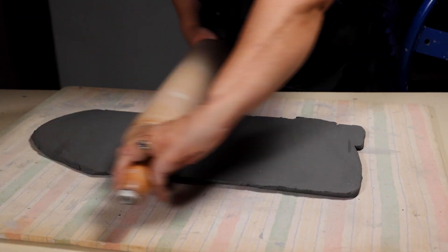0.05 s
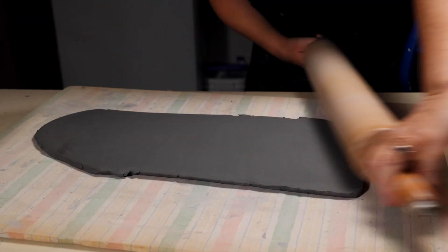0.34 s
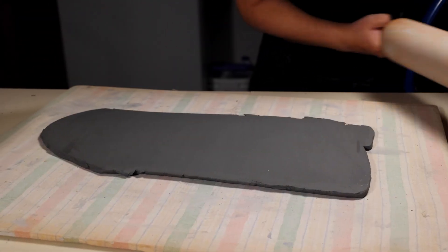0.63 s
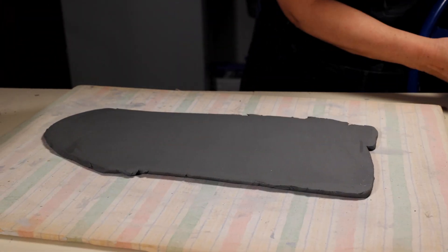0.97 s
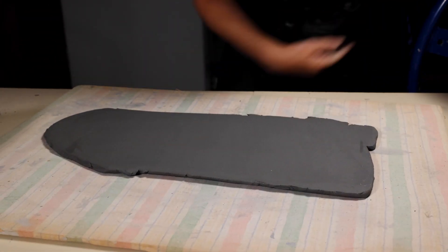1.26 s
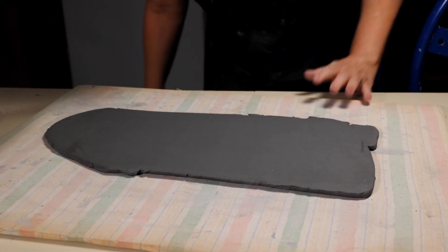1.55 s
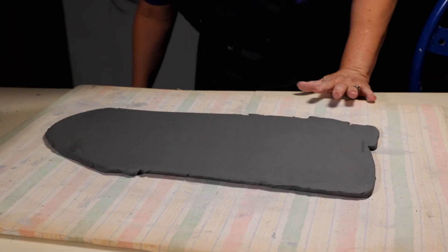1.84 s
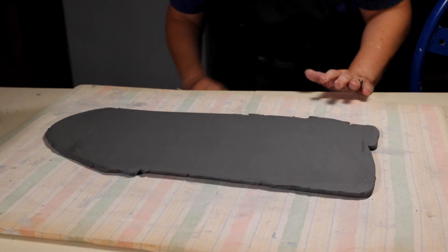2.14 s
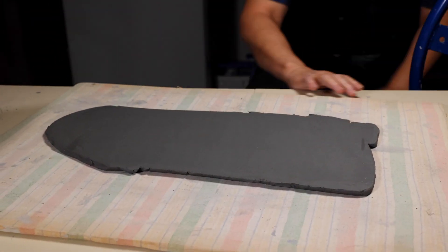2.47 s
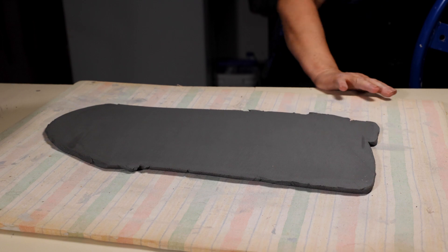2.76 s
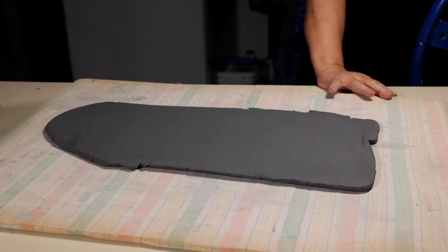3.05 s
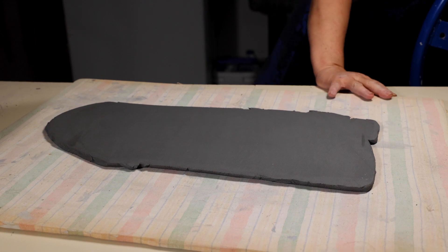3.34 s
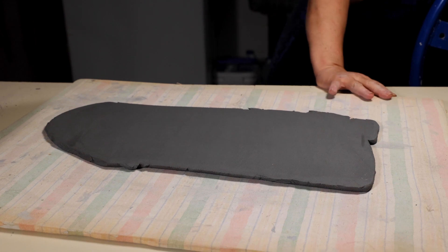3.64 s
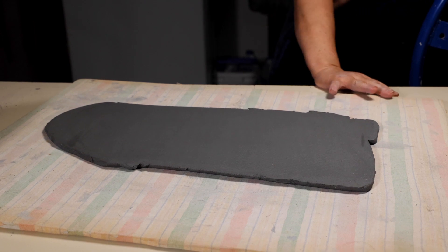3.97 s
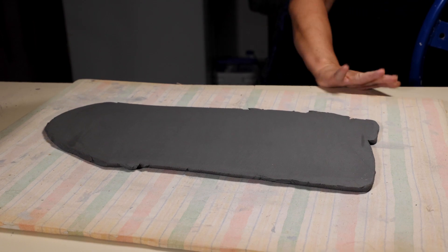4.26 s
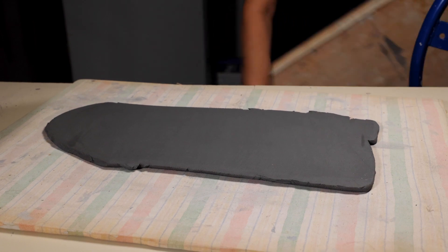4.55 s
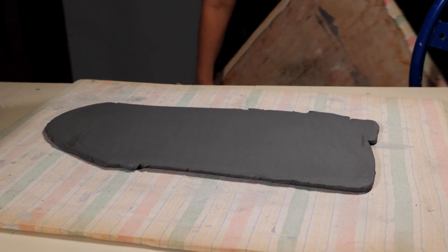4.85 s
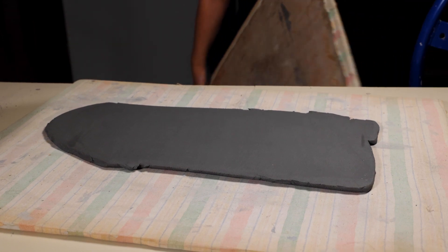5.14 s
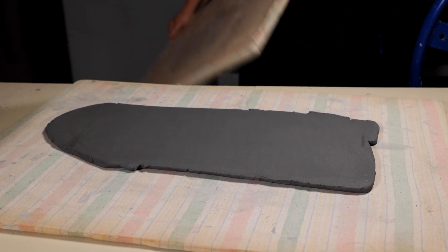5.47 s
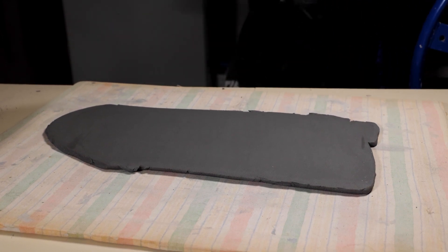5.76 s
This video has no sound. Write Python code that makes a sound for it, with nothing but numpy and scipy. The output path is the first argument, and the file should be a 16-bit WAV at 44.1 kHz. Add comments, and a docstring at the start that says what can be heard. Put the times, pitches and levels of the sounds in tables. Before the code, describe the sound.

A wooden rolling pin trundles faintly off canvas, its loose handles clicking lightly during the first half second. At about 0.9 and 1.1 seconds it lands on a table with two hard, ringing wooden knocks with a low thud. They are by far the loudest sounds and slightly overload the close microphone. A small rattle follows, then a soft pat of a hand at about 1.7 seconds. From 2 to 4.4 seconds sleeves rustle and a hand brushes the canvas quietly, while a wooden board gives short, faint scrapes, with a slight judder around 3 seconds and a soft bump at 3.7. From 4.6 to 5.5 seconds the board is dragged out, rubbing on clothing, with hollow bumps and sharp ticks, strongest near 4.9. A last rustle fades by 5.8 seconds. The room is small and quiet, with a faint low rumble throughout.

```python
"""In a small quiet room, a wooden rolling pin with loose, clicking handles is lifted off a clay slab and set
down on a table. Two hard knocks excite the modes of pin and table and overload a close microphone.
Then sleeves rustle and a hand brushes the canvas, as threads catch and let go. A wooden board is dragged
out from beside the table, ringing where it bumps and scraping by stick-slip friction, over a low rumble."""
import sys
import numpy as np
from scipy import signal
from scipy.fft import rfft, irfft
from scipy.io import wavfile

SR = 44100
rng = np.random.default_rng(int(sys.argv[2]) if len(sys.argv) > 2 else 0)


def bounce(signal):
    """Save signal as a 16-bit WAV file at the path given by the first command-line argument."""
    frames = np.transpose(np.atleast_2d(signal))
    limited = np.clip(frames, -1, 1)
    pcm = np.round(limited * 32767).astype(np.int16)
    wavfile.write(sys.argv[1], SR, pcm)


N = 256220
TIME = np.arange(N) / SR
AGE = np.arange(SR) / SR  # the one-second time axis of a single event

# Landings of the pin. Each row: start in seconds, level in dB, contact time in ms,
# place struck from 0 (first end) to 1 (other end).
PIN_LANDINGS = [(0.863, 14, 0.71, 0.13), (1.006, -16.5, 2.6, 0.17), (1.063, -20, 2.3, 0),
                (1.134, 11, 0.82, 1), (1.268, -25, 1.5, 0.71), (1.36, -34, 2.7, 1)]
# Modes of the board. Each row: frequency in Hz, level in dB, T60 in seconds.
BOARD_MODES = [(130, -14.5, 0.17), (251.8, -15.5, 0.6), (308, -8.5, 0.079), (391.6, -2.5, 0.094),
               (462.6, -0.5, 0.21), (595, -3, 0.087), (663, 2, 0.082), (809, -9, 0.22), (912, -5, 0.095),
               (1330, -17, 0.038), (1340, -19, .1), (1810, -9.5, 0.12), (2160, -31, 0.11), (2543, -10, .1),
               (3100, -12, 0.25), (4020, -19, 0.073)]


def pin_knocks():
    """Modal excitation: the place struck weights the modes, and a shorter contact gives more treble."""
    # Modes of pin and table together. Each row: frequency in Hz, T60 in seconds,
    # level in dB when struck at the first end, level in dB when struck at the other.
    modes = [(62.1, 0.88, -32.5, -31.5), (88, 0.38, -27.5, -27), (118.2, 0.4, -21, -19.5),
             (156.2, 0.37, -17, -18), (207.1, 0.31, -15.5, -19), (241.5, 0.15, -10, -15),
             (279.4, 0.34, -14, -7.5), (309.8, .34, -1, -29), (343.4, 0.61, -25.5, -18.5),
             (362.1, 0.23, -1, -7.5), (389.8, 0.31, -6.5, -21.5), (447, 0.16, -16, -10.5),
             (484.3, .26, -12.5, -18.5), (516.7, 0.17, -10, -10), (539.3, 0.34, -12, -21.5),
             (573.3, .27, -20, -12.5), (614, 0.27, -12.5, -10.5), (671.6, 0.26, -17.5, -14.5),
             (778, 0.24, -14, -15.5), (835, 0.27, -14.5, -24), (885, 0.18, -13, -24.5),
             (935, 0.18, -21, -15.5), (1093, 0.39, -20.5, -39), (1340, 0.16, -10, -16),
             (1464, 0.18, -12.5, -17.5), (1663, 0.14, -18.5, -13.5), (1883, .2, -15.5, -18.5),
             (2220, .2, -19, -25.5), (2420, 0.097, -17.5, -8)]
    # Spectrum of the wood's crack and its reverberation. Each row: frequency in Hz, density in dB.
    crack_spectrum = [(40, -9.5), (120, -3.5), (400, 4.5), (900, -5.5), (1700, -10), (3000, -16),
                      (6000, -20), (10000, -27), (15000, -35.5)]
    out = np.zeros(N)
    for start, db, contact_ms, place in PIN_LANDINGS:
        body = ring([(hz, first + place * (other - first), t60) for hz, t60, first, other in modes])
        crack = undb(-2.5) * noise(crack_spectrum, size=SR) * fade(0.075)
        tail = undb(-7.0) * diffuse_tail(crack_spectrum, stretch=0.93)
        add(out, start, undb(db) * (soften(body + crack, contact_ms) + soften(tail, .3 * contact_ms)))
    return out


def handle_clicks():
    """Selective excitation: a handle snaps on its axle and rings most the modes near a focus frequency."""
    # Each row: start in seconds, level in dB, contact time in ms, focus frequency in Hz.
    clicks = [(0.143, -40.5, 0.34, 1300), (0.199, -33, 0.27, 1650), (0.4491, -30, 0.18, 2100),
              (0.451, -23, 0.29, 1800), (0.477, -32.5, 0.37, 700), (0.828, -37, 0.5, 1140),
              (1.015, -20, 0.41, 2940), (1.065, -23.5, 0.81, 1410)]
    # Modes of a handle. Each row: frequency in Hz, level in dB, T60 in seconds.
    modes = [(390, -1, .07), (720, -7, .05), (1330, 1.5, 0.1), (1437, -1.5, 0.07), (2020, -12.5, 0.026),
             (2780, -7, 0.077), (3100, -10, .06), (5000, -10, 0.059), (5820, -8.5, .04)]
    out = np.zeros(N)
    for start, db, contact_ms, focus_hz in clicks:
        body = ring([(hz, mode_db - 9 * abs(np.log2(hz / focus_hz)), t60) for hz, mode_db, t60 in modes])
        snap_spectrum = [(200, -12), (focus_hz, 0), (3 * focus_hz, -9), (4.5 * focus_hz, -30)]
        snap = noise(snap_spectrum, size=SR) * fade(0.0087)
        add(out, start, undb(db) * soften(body + snap, contact_ms))
    return out


def board_bumps():
    """Free vibration: light blows against the table give a hollow crack and leave the board ringing."""
    # Each row: start in seconds, relative level in dB, contact time in ms.
    bumps = [(3.666, -26, 2.7), (4.645, -43, 1.1), (4.665, -30, 2.8), (4.88, -15.5, 1.6),
             (4.924, -30.5, 0.64), (5.001, -29, 0.86), (5.056, -26.5, 0.39), (5.091, -23, 0.2),
             (5.101, -23, 0.2), (5.153, -29.5, 0.12), (5.184, -28, 1), (5.455, -40, 0.11)]
    # Spectrum of the crack. Each row: frequency in Hz, density in dB.
    crack_spectrum = [(60, -15), (250, -22), (450, 9), (750, 2), (1200, -10), (2000, -6.5), (4000, -23),
                      (12000, -20.5)]
    out, body = np.zeros(N), ring(BOARD_MODES)
    for start, db, contact_ms in bumps:
        crack = noise(crack_spectrum, size=SR) * fade(0.16)
        add(out, start, undb(db - 7) * soften(body + crack, contact_ms))
    return out


def chair_ticks():
    """Hard impact: a very brief contact with a metal chair is broadband and excites its thin, high modes."""
    # Each row: start in seconds, level in dB, level of the ring relative to the snap in dB.
    ticks = [(4.676, -31, -39), (4.873, -27.5, -36), (4.879, -24.5, -15), (4.939, -23.5, -8),
             (5.208, -31.5, -25)]
    # Modes that ring after a tick. Each row: frequency in Hz, level in dB, T60 in seconds.
    modes = [(1750, -0.5, 0.031), (2080, 11, 0.013), (4500, -0.5, 0.036), (4770, -2.5, 0.049),
             (6400, -20, 0.09), (8900, -5.5, 0.038)]
    snap_spectrum = [(500, 6), (2000, -1), (4500, 6.5), (9000, -1.5), (15000, -9)]
    out = np.zeros(N)
    for start, db, ring_db in ticks:
        snap = noise(snap_spectrum, size=SR) * fade(0.0048)
        add(out, start, undb(db) * (snap + undb(ring_db) * ring(modes)))
    return out


def thuds():
    """Low-frequency response: a contact moves the table's lowest range in a short burst of bass."""
    # Low thuds of the pin's two hard landings, then soft bumps of hands and board.
    # Each row: start in seconds, level in dB, length in seconds.
    contacts = [(0.864, -10, 0.12), (1.138, -13, 0.11), (0.2, -43, .06), (1.652, -36.5, 0.053),
                (4.645, -33, 0.096), (4.881, -29.5, 0.057), (5.058, -46, 0.25), (5.449, -49, 0.11)]
    spectrum = [(25, -42), (60, 0), (130, 4.5), (250, -14.5), (700, -12), (3000, -72)]
    out, rise = np.zeros(N), 1 - fade(.04)
    for start, db, length in contacts:
        decay = np.exp(-(AGE / length * 2) ** 2)
        add(out, start, undb(db) * rise * decay * noise(spectrum, size=SR))
    return out


def sliding_wood():
    """Irregular stick-slip: random slips of wood on wood rasp and drive the modes of the board."""
    # The pin trundles on the table. Each row: start in seconds, length in seconds, initial level in dB.
    trundles = [(0, .46, -49), (1.458, 0.78, -52)]
    # Wood scrapes on wood. Each row: start in seconds, length in seconds, level in dB.
    scrapes = [(2.2, .03, -52.5), (2.295, 0.074, -51.5), (2.82, .09, -45), (2.91, 0.058, -43.5),
               (3.36, .1, -59), (3.54, 0.098, -49), (3.665, 0.058, -43), (3.73, .08, -39.5),
               (3.88, 0.052, -52.5), (4.245, .045, -55), (4.635, .05, -52), (4.86, .09, -40),
               (5.075, 0.15, -38), (5.27, 0.14, -48), (5.445, 0.1, -50.5)]
    # Spectrum of the dry rasp. Each row: frequency in Hz, density in dB.
    spectrum = [(60, -13), (200, 2), (400, 0), (750, -4), (1300, -9.5), (2500, -24.5), (5000, -25),
                (10000, -47.5)]
    attack_s, release_s, slowing_db_per_s = 0.016, 0.033, 7.5
    slips = grains(rate=1500, spread_db=1.5)
    rasp = undb(-1.0) * colour(slips, spectrum)
    ringing = undb(-11.5) * unit(convolve(slips, ring(BOARD_MODES)))
    trundle = sum(undb(db - slowing_db_per_s * (TIME - s)) * stroke(s, length, attack_s, release_s)
                  for s, length, db in trundles)
    return (rasp + ringing) * (trundle + strokes(scrapes, attack_s, release_s))


def judders_and_squeaks():
    """Periodic stick-slip: the sliding board judders low, and a handle squeaks as it stops turning."""
    # In both, each row: midpoint in seconds, level in dB, half length in seconds, frequency in Hz.
    judders = [(2.96, -31.5, 0.018, 265.6), (3.101, -32.5, 0.02, 265.8)]
    squeaks = [(1.453, -51, .009, 2360), (1.454, -49.5, .008, 4700), (1.479, -54, .012, 4870)]
    out, middle = np.zeros(N), AGE.mean()
    for events, waver in (judders, 0.038), (squeaks, 0.0225):
        for s, db, half_length, hz in events:
            drift = noise([(30, -4), (150, -28.0), (600, -50)], size=SR)
            tone = np.sin(2 * np.pi * np.cumsum(hz * (1 + waver * drift)) / SR)
            swell = np.exp(-((AGE - middle) / half_length) ** 2)
            add(out, s - middle, undb(db) * tone * swell)
    return out


def scuffs():
    """Friction noise: skin skids on the canvas at the table's edge, giving one broad spectral peak."""
    # Each row: start in seconds, level in dB, length in seconds, peak frequency in Hz.
    skids = [(2.212, -49, 0.058, 1360), (2.675, -48, 0.071, 2400), (2.928, -44, 0.034, 930),
             (3.071, -51, 0.03, 770), (4.257, -46.5, 0.02, 990)]
    out = np.zeros(N)
    for start, db, length, hz in skids:
        spectrum = [(hz / 6, -12), (hz / 2, -4), (hz, 0), (1.14 * hz, -3), (3 * hz, -17), (9 * hz, -36)]
        envelope = (1 - fade(0.005)) * np.exp(-(AGE / length) ** 2)
        add(out, start, undb(db) * noise(spectrum, size=SR) * envelope)
    return out


def rustles():
    """Cloth friction: canvas under the pin until it lands, canvas under hands, apron against board."""
    # The pin rolls off the canvas and is swung aside.
    # Each row: time in seconds, relative treble level in dB, tilt in dB per octave.
    roll_path = [(0.0, -67, -4), (0.2, -62.5, 2.5), (0.284, -64.5, 1), (0.402, -56, 1), (0.474, -67, 0),
                 (0.586, -54, 2), (0.76, -61.5, -4), (0.8, -55.5, 1), (0.85, -58.5, 1)]
    # Strokes of hand or sleeve, and pulls of the board along the apron. Each row: start in seconds,
    # length in seconds, relative treble level in dB, tilt in dB per octave.
    brushes = [(1.29, 0.12, -54, -2.5), (1.435, .03, -56, 1), (1.542, .03, -57.5, 6),
               (1.635, .033, -42.5, -1), (1.73, 0.023, -53.5, -2), (2.261, 0.077, -55, -3.5),
               (2.47, .11, -61, -0.5), (2.583, 0.089, -48.5, 2.5), (2.67, 0.066, -58, 1),
               (2.837, 0.067, -56.5, 1.5), (2.924, 0.059, -49.5, 2), (3.34, 0.089, -56.5, -.5),
               (3.467, 0.068, -59, -0.5), (3.536, 0.073, -54.5, -0.5), (3.621, 0.21, -51, 0.5),
               (3.887, 0.064, -54.5, 0), (4.008, .03, -63, 5), (4.253, 0.044, -57.5, -5.5),
               (4.334, 0.028, -53.5, 0)]
    pulls = [(4.631, 0.059, -48.5, 1), (4.73, 0.087, -53, -1.5), (4.888, 0.074, -44, 0.5),
             (5.023, 0.14, -50, -3), (5.211, 0.15, -47.5, 1.5), (5.437, 0.14, -49, .3),
             (5.65, 0.16, -49.5, 2)]
    # Spectra of the three rustles before tilting. Each row: frequency in Hz, density in dB.
    roll_spectrum = [(120, -2.5), (350, -1), (700, 6), (1300, 4), (2500, -1.5), (4000, -0.5), (5500, -1),
                     (8000, -7.5), (12000, -9), (15500, -14)]
    brush_spectrum = [(150, -12), (500, -4), (1000, 0.5), (2200, -0.5), (3500, 0), (5000, 1), (7500, -4),
                      (9500, -8.5), (12000, -12.5), (15500, -20)]
    apron_spectrum = [(150, -4), (500, 6.5), (1000, -1.5), (2200, 0), (3500, -1.5), (5000, -1.5),
                      (7000, -4), (9500, -10.5), (12000, -12), (15500, -22)]
    times, roll_db, roll_tilt = np.transpose(roll_path)
    before_landing = TIME < PIN_LANDINGS[0][0]
    roll = [(undb(np.interp(TIME, times, roll_db)) * before_landing, np.interp(TIME, times, roll_tilt))]
    hands = [(undb(db) * stroke(s, length, attack_s=0.032, release_s=0.029), tilt)
             for s, length, db, tilt in brushes]
    apron = [(undb(db) * stroke(s, length, attack_s=0.035, release_s=0.053), tilt)
             for s, length, db, tilt in pulls]
    return (cloth(roll, roll_spectrum, gain_db=9.0) + cloth(hands, brush_spectrum, gain_db=2.0)
            + cloth(apron, apron_spectrum, gain_db=2.5))


def cloth(moves, spectrum, gain_db):
    """Micro-slip: threads catch and let go; each (gain, tilt) move has its own loudness and brightness."""
    threads = colour(grains(rate=9900, spread_db=0.5), spectrum)
    out, pivot_hz = np.zeros(N), 5500
    for hz, band in octaves(threads):
        octave = max(np.log2(hz / pivot_hz), -2)
        out += band * sum(gain * undb(tilt * octave) for gain, tilt in moves)
    return undb(gain_db) * out


def background():
    """Ambient noise: steady air, and a humming rumble of table and floor that swells as weight shifts."""
    # Spectra of the air and the rumble. Each row: frequency in Hz, density in dB.
    air_spectrum = [(12, -37.5), (20, -4), (49, -3.5), (70, 1), (166, -12), (478, -13), (725, -16.5),
                    (857, -14.5), (1200, -20.5), (2840, -23), (3750, -29), (4430, -24.5), (15500, -39)]
    rumble_spectrum = [(20, -16.5), (35, -4), (62, 0), (85, 0), (120, -10), (250, -32.5), (600, -57.5)]
    # Shifts of weight. Each row: start in seconds, length in seconds, level in dB.
    shifts = [(0, .06, -44.5), (.3, 0.14, -47), (1.42, 0.25, -44), (2.8, 0.24, -51), (4.29, 0.23, -47),
              (5.02, 0.28, -39)]
    hum_hz, air_db, rest_db = 66.2, -56, -57.5
    waver = 1 + .4 * noise([(2, -1.0), (8, -4.5), (25, -59.5), (100, -120)])
    hum = np.sin(2 * np.pi * hum_hz * TIME) * waver
    rumble = undb(-1.5) * noise(rumble_spectrum) + undb(-2.5) * hum
    swell = np.hypot(undb(rest_db), strokes(shifts, attack_s=0.039, release_s=0.11))
    return undb(air_db) * noise(air_spectrum) + rumble * swell


def room(x, wet_db):
    """Reverberation: the direct sound is followed by the dense reflections of a small workshop."""
    build_up = 1 - fade(0.022)
    tail = diffuse_tail([(60, -2), (400, -1.5), (3000, -3.5), (15000, 1.0)], stretch=1.0) * build_up
    return x + undb(wet_db) * convolve(x, tail / np.linalg.norm(tail))


def diffuse_tail(spectrum, stretch):
    """Diffuse decay: each octave of a noise dies away in the room's reverberation time times stretch."""
    # Each row: frequency in Hz, reverberation time in seconds.
    room_t60 = [(100, 0.48), (500, 0.35), (2000, 0.29), (6000, 0.25), (15000, 0.22)]
    bands = octaves(noise(spectrum, size=SR))
    return sum(band * fade(stretch * along(room_t60, hz)) for hz, band in bands)


def stroke(start, length, attack_s, release_s):
    """Envelope of one movement, which is fastest, and so loudest, at its middle."""
    arch_db = 1.5
    age = np.maximum(TIME - start, 0)
    onset = np.sin(np.pi / 2 * np.minimum(age / attack_s, 1)) ** 2
    arch = undb(-arch_db * (2 * np.minimum(age / length, 1) - 1) ** 2)
    return onset * arch * np.exp(-np.maximum(age - length, 0) / release_s)


def strokes(rows, attack_s, release_s):
    """Summed envelope of (start, length, dB) movements."""
    return sum(undb(db) * stroke(s, length, attack_s, release_s) for s, length, db in rows)


def grains(rate, spread_db):
    """Shot noise: tiny slips of unequal size at random times, on average rate per second."""
    impulses = (rng.random(N) < rate / SR) * rng.standard_normal(N)
    return unit(impulses * undb(spread_db * rng.standard_normal(N).clip(-2, 2)))


def ring(modes):
    """Modal superposition: the impulse response of (Hz, dB, T60) modes."""
    return sum(undb(db) * fade(t60) * np.sin(2 * np.pi * hz * AGE) for hz, db, t60 in modes)


def fade(t60):
    """Exponential decay by 60 dB in t60 seconds."""
    return np.exp(-np.log(1000) * AGE / t60)


def soften(x, contact_ms):
    """Contact low-pass: a longer contact pushes more gently and takes the treble away."""
    pole = np.exp(-2 * np.pi / (contact_ms * SR / 1000))
    return signal.lfilter([1 - pole], [1, -pole], x)


def noise(spectrum, size=N):
    """Coloured Gaussian noise of rms 1."""
    return colour(rng.standard_normal(size), spectrum)


def colour(x, spectrum):
    """Spectral shaping by (Hz, dB) points, scaled to rms 1."""
    gain = undb(along(spectrum, np.fft.rfftfreq(len(x), 1 / SR)))
    return unit(irfft(rfft(x) * gain, len(x)))


def octaves(x):
    """Complementary filter bank: overlapping (centre Hz, band) pairs that sum to x."""
    spectrum, hz = rfft(x), np.fft.rfftfreq(len(x), 1 / SR)
    octave = np.log2(hz.clip(64, 16384))
    return [(2 ** k, irfft(spectrum * np.maximum(1 - abs(octave - k), 0), len(x)))
            for k in np.unique(np.round(octave))]


def along(points, hz):
    """Interpolation of (Hz, value) points on a log-frequency axis."""
    point_hz, value = np.transpose(points)
    return np.interp(np.log(hz + 1), np.log(point_hz), value)


def convolve(x, response):
    """Convolution with an impulse response, keeping the length."""
    return signal.fftconvolve(x, response)[:len(x)]


def add(track, s, sound):
    """Superposition of a sound on the track at s seconds."""
    start = max(int(s * SR), 0)
    track[start:start + len(sound)] += sound[:N - start]


def undb(db):
    """Decibels to amplitude ratio."""
    return 10 ** (np.asarray(db) / 20)


def unit(x):
    """Normalisation to rms 1."""
    return x / np.sqrt(np.mean(x ** 2))


def scene():
    """Superposition of all sources in the room, in mono."""
    tones = judders_and_squeaks()
    contacts = room(handle_clicks() + board_bumps() + chair_ticks() + scuffs() + thuds() + tones,
                    wet_db=-8.5)
    rubbing = room(rustles() + sliding_wood(), wet_db=-10.5)
    return (pin_knocks() + contacts + rubbing + background())[None]


def record(dry):
    """Saturation: the input stage flattens the knocks; the level then sags briefly and the top is cut."""
    # The dip in level after the first knock. Each row: time in seconds, gain in dB.
    sag = [(0.865, 0), (0.97, -3.7), (1.06, -7.5), (1.134, -11), (1.22, -7.8), (1.4, -3), (1.65, 0)]
    ceiling, cutoff_hz = undb(-1.8), 15900
    oversampled = signal.resample_poly(dry, 4, 1, axis=-1)  # limits aliasing
    clipped = oversampled / (1 + (oversampled / ceiling) ** 8) ** (1 / 8)
    flattened = signal.resample_poly(clipped, 1, 4, axis=-1)
    sagged = flattened * undb(np.interp(TIME, *np.transpose(sag)))
    return signal.sosfilt(signal.ellip(8, .2, 80, cutoff_hz, fs=SR, output="sos"), sagged)


dry = scene()
out = record(dry)
bounce(out)
```